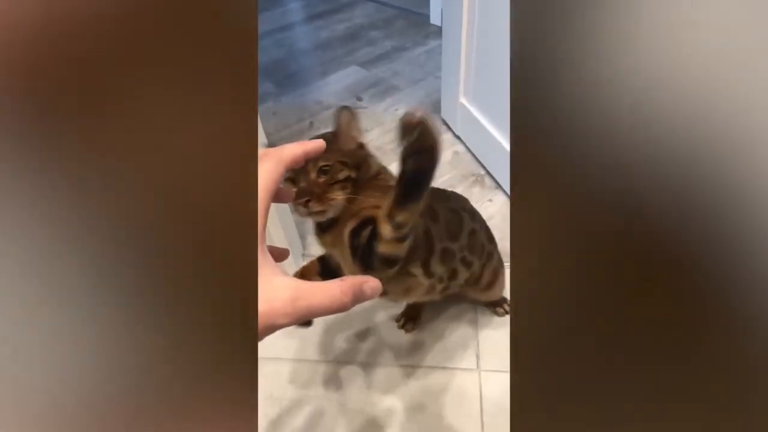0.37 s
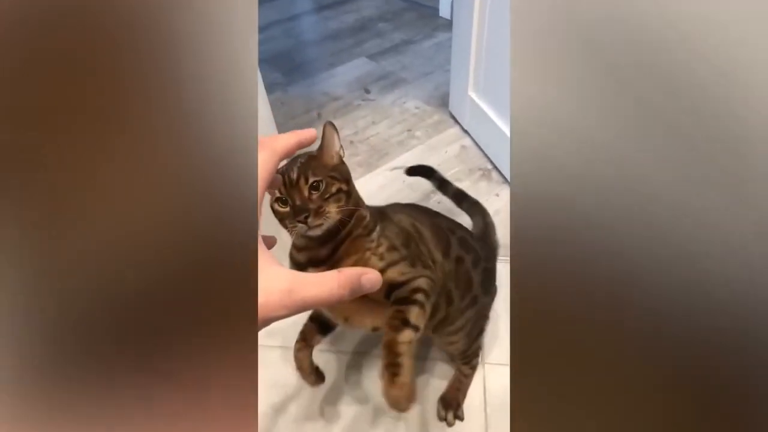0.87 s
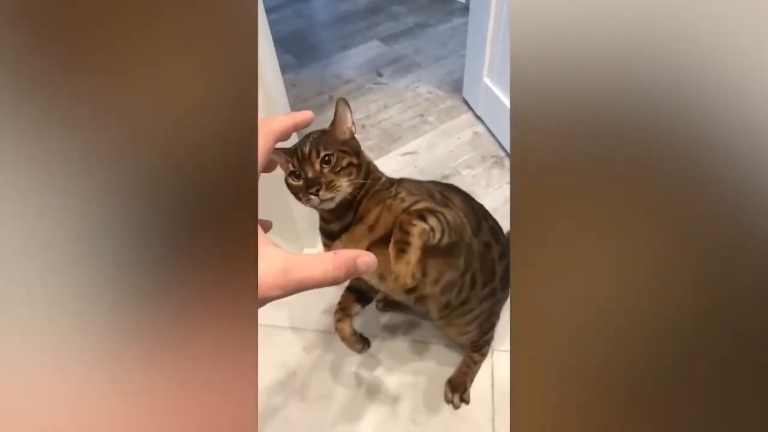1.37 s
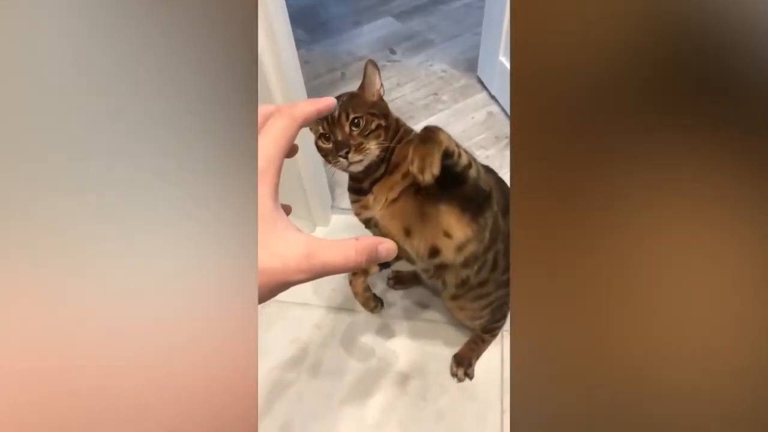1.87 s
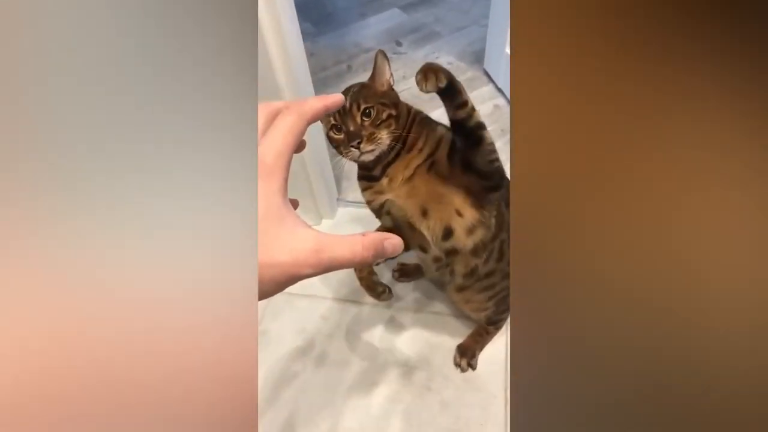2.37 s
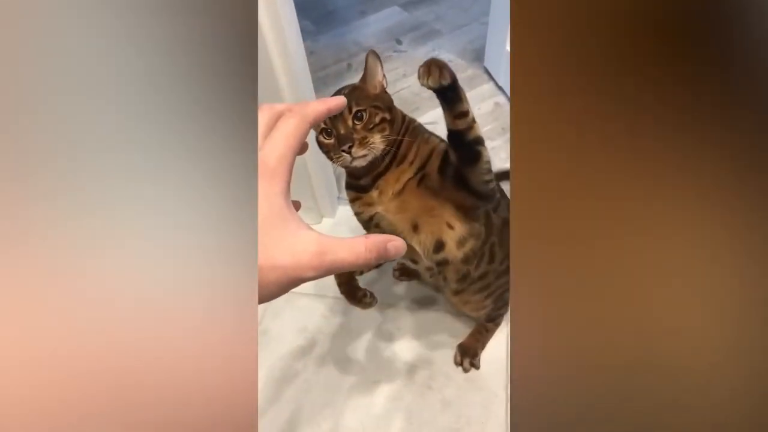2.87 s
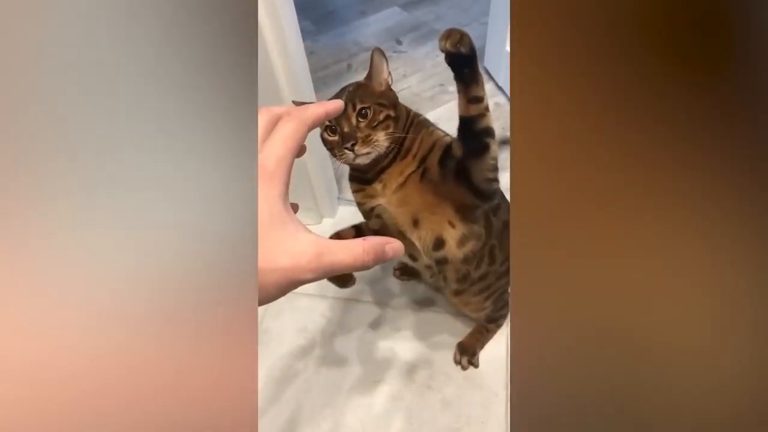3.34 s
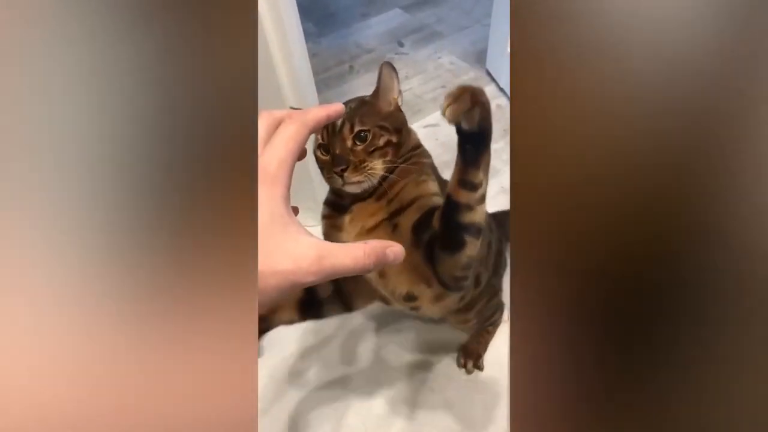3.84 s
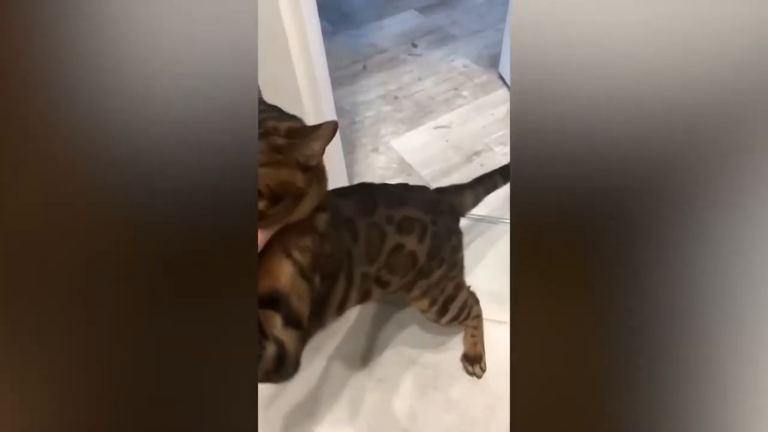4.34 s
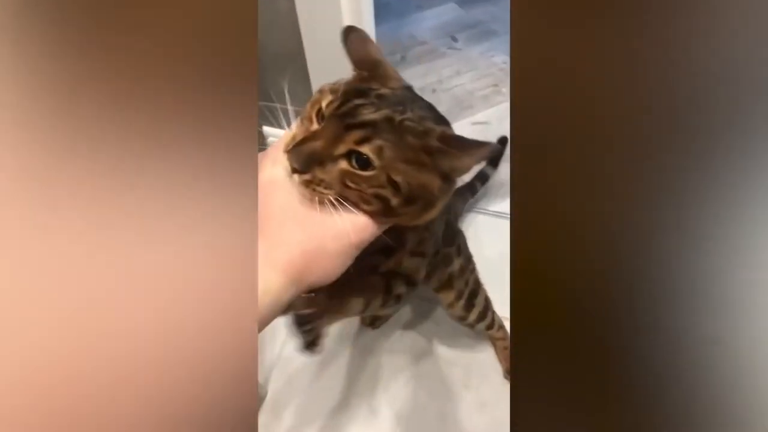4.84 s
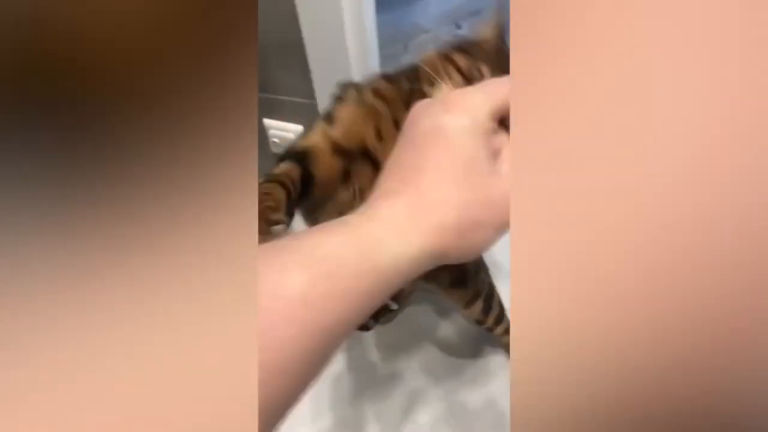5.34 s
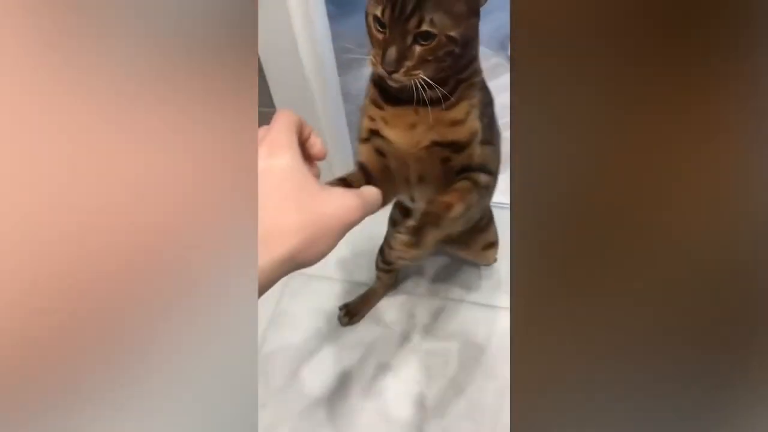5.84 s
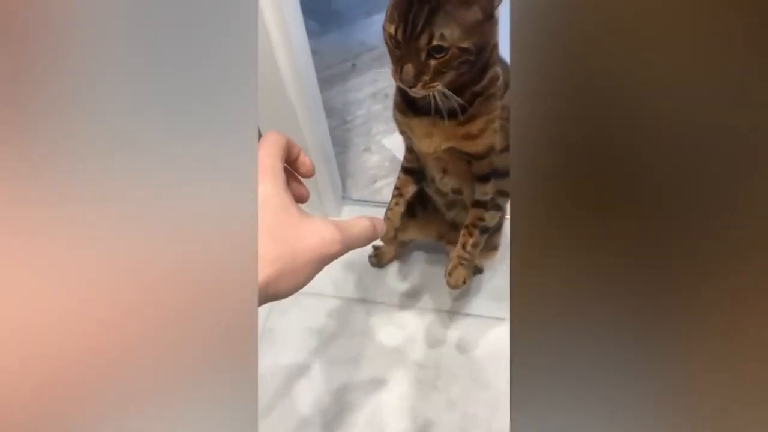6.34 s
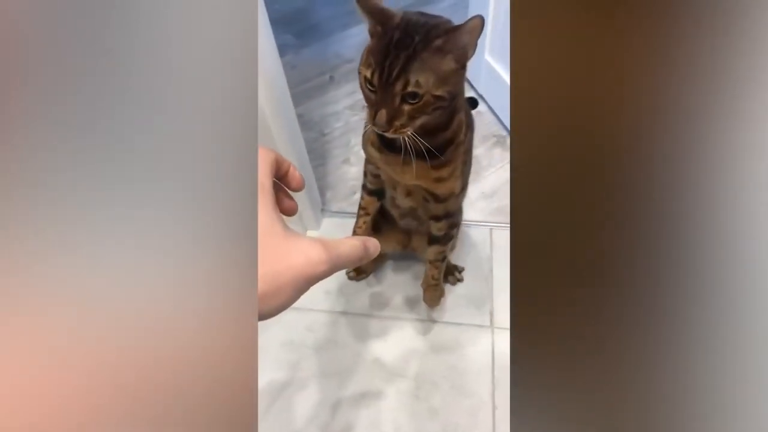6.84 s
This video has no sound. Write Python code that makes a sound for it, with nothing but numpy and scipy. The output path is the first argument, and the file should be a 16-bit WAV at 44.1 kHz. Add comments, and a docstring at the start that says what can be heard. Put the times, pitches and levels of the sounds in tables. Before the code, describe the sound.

A cat paws at a hand in a hard tiled room, caught in mono by a close phone microphone. Faint taps and a gritty skid come first, then a sharp, reverberant knock further away and a duller double knock with floor boom. After a quiet gap, a sudden scuffle of taps, fur and phone jolt, soft palm rubbing, then another quick pat and fading rustle.

```python
"""In a tiled room a cat paws at a hand, close to a mono phone microphone. Paws tap as minimum-phase impulses
and skid on tile as resonated friction noise; fur and a pushing head rub as clumped noise; the phone is jolted
by low noise and decaying sines. Further off something knocks, mostly heard through the room's noise tail, and
the floor booms as a sum of decaying modes. The room itself hisses and hums faintly as filtered noise."""
import sys
import numpy as np
from scipy import signal
from scipy.fft import rfft, irfft, next_fast_len
from scipy.io import wavfile
from scipy.ndimage import uniform_filter1d

SR = 44100
rng = np.random.default_rng(int(sys.argv[2]) if len(sys.argv) > 2 else 0)


def to_wav(sig):
    """Store sig (one row per channel, or 1-D mono) as 16-bit WAV at the path in sys.argv[1].

    Samples outside -1..1 are clipped; the rate is SR.
    """
    pcm = np.clip(np.atleast_2d(sig), -1, 1) * 32767
    pcm = np.round(pcm).astype(np.int16)
    wavfile.write(sys.argv[1], SR, pcm.T)  # frames by channels


def volts_from_decibels(level):
    """Turn decibel levels (scalar or array-like) into linear amplitude factors."""
    exponent = np.asarray(level, float) / 20
    return 10 ** exponent


N = 306814

# Steady air noise. Each row: frequency in Hz, relative power density in dB.
AIR_SPECTRUM = [(12, -56), (20, -39), (50, -3.5), (70, -3), (163, -13.5), (270, -13), (337, -16),
                (485, -20), (542, -19), (780, -21.5), (1710, -28), (2200, -29.5), (4810, -34),
                (14700, -40.5), (16000, -30)]
# Narrow hummed bands in the room tone. Each row: centre in Hz, width in Hz, rms level in dB.
HUM_BANDS = [(788, 34, -70.5), (998, 19, -78), (2186, 9.9, -82.5)]
# Reverberant tail of the tiled room. Each row: frequency in Hz, t60 in seconds, relative strength in dB.
ROOM_DECAY = [(200, 0.31, 13.5), (690, 0.42, 6), (2030, 0.34, 0), (4000, 0.38, 0.5), (8500, 0.2, 2.5),
              (15200, 0.086, 2)]
# Blows and soft footfalls that shake the floor. Each row: start in seconds, boom gain in dB.
FLOOR_SHOCKS = [(0.122, -55), (0.739, -46), (1.861, -33), (2.118, -40), (2.282, -50), (2.397, -29.5),
                (2.68, -47), (3.368, -52), (3.6, -53), (3.72, -54), (4.3, -45), (4.764, -54),
                (5.603, -49.5), (6.748, -51)]
# Modes of the floor. Each row: frequency in Hz, mean relative level in dB, t60 in seconds.
FLOOR_MODES = [(57.47, -2.5, 0.81), (73.16, 0.5, 0.62), (129.6, -14, 1.1), (183.4, -5.5, 0.24),
               (211, -12, 0.88), (233.1, -11, 0.47), (265.5, -12.5, 0.55), (361, -13.5, 0.38)]
# Paw and claw taps near the microphone. Each row: start in seconds, peak of the push in dB, crack in Hz,
# body against crack in dB, edge against crack in dB.
TAPS = [(.265, -42, 4000, -12, -7), (0.727, -40.5, 2900, -2, -28), (4.012, -37.5, 1340, -8, -26),
        (4.127, -28, 2550, -7, -18), (4.158, -29, 1490, 6, 1), (4.442, -42, 1550, -13, -29.5),
        (5.331, -28, 1690, 6.5, -14.5), (5.415, -38, 2900, -2, -22), (5.518, -38.5, 2460, -21, -12),
        (5.739, -43, 3220, -12, -14), (6.622, -47.5, 3750, -18, -19)]
# Strokes of fur. Each row: peak time in seconds, rise and fall over 20 dB in seconds,
# coarse level in dB, fine hiss level in dB.
FUR_STROKES = [(.602, 0.028, 0.036, -57, -48.5), (.676, 0.056, 0.06, -60, -56.5),
               (3.676, .04, 0.061, -63, -69), (4.131, 0.0081, 0.022, -33.5, -38),
               (4.162, 0.018, 0.096, -37, -44.5), (4.3, 0.24, 0.51, -70, -75), (4.61, .25, 0.24, -67, -71),
               (4.79, 0.33, 0.38, -61.5, -62), (5.262, 0.22, 0.081, -61, -61),
               (5.335, .015, 0.02, -46, -45.5), (5.36, 0.12, 0.13, -58, -60),
               (5.414, 0.063, 0.053, -49, -50.5), (5.62, 0.43, 0.34, -68, -68.5),
               (5.86, 0.25, 0.39, -67.5, -69)]
# Coarse rubbing of fur. Each row: frequency in Hz, relative power density in dB.
FUR_SPECTRUM = [(700, 5), (1300, 4), (2600, 1), (4500, -1.5), (6500, -5.5), (9000, -62)]
# Fine friction hiss of fur and pads. Each row: frequency in Hz, relative power density in dB.
FINE_SPECTRUM = [(4500, -24), (6000, -1), (9000, 0), (10500, -4), (13500, -1), (16000, -1)]
# Paw pads skidding on tile. Each row: peak time in seconds, rise and fall over 20 dB in seconds,
# grit level in dB, fine hiss level in dB.
SKIDS = [(.761, .03, .022, -39, -45.5), (.791, 0.028, 0.046, -48, -43.5), (.83, 0.11, 0.17, -64.5, -60.5),
         (3.0, .15, 0.27, -64, -78), (5.265, 0.11, 0.088, -57.5, -73)]
# Resonances of the skidding pads. Each row: centre in Hz, width in Hz, relative gain in dB.
PAD_RESONANCES = [(2900, 570, 5), (4970, 1300, 1)]
# Far knocks. Each row: start in seconds, peak of the push in dB, crack in Hz,
# thud against crack in dB, body against crack in dB.
KNOCKS = [(1.855, -34, 2300, 18, 11), (2.107, -8, 2620, -5, -3.5), (2.336, -24, 1760, -10, -6.5),
          (2.342, -23.5, 1840, -8, -4), (2.392, -22, 2280, 13, 4.5), (2.735, -51.5, 2450, 22, 5)]
# Frequencies the far object favours. Each row: frequency in Hz, gain in dB.
STRUCK_COLOUR = [(150, 1), (222, 6.5), (400, -5), (640, 6), (800, -0.5), (1000, 5.5), (1450, 4), (2150, 6),
                 (2800, 0), (3600, 1.5), (5000, -2), (6200, 2), (8000, -3)]
# The head pushed into the palm. Each row: peak time in seconds, rise and fall over 20 dB in seconds, level in dB.
HEAD_RUBS = [(4.59, 0.64, 0.12, -59.5), (4.95, 0.29, 0.38, -59)]
# Rubbing in the palm. Each row: frequency in Hz, relative power density in dB.
PALM_SPECTRUM = [(180, -21), (350, 10.5), (600, 7.5), (900, 0), (1600, -27)]
# The phone shaken in the hand. Each row: peak time in seconds, rise and fall over 20 dB in seconds, level in dB.
JOLTS = [(4.178, 0.024, 0.019, -25), (4.215, 0.03, 0.081, -38)]
# Pushes on the shaken microphone. Each row: frequency in Hz, relative power density in dB.
SHAKE_SPECTRUM = [(20, -30), (40, -2), (70, 8), (110, -18), (200, -5.5), (450, -20.5), (700, -10.5),
                  (1200, -40), (2500, -72)]
# A knuckle or paw bumping the phone. Each row: start in seconds, frequency in Hz, initial amplitude in dB.
BUMPS = [(4.159, 193, -27), (5.385, 221, -40), (5.397, 190, -31)]


def unit(x):
    """Normalisation: the signal is scaled to rms 1."""
    return x / np.sqrt(np.mean(x ** 2) + 1e-20)


def along(points, hz):
    """Logarithmic frequency: (Hz, value) points are interpolated on a log axis."""
    f, v = np.transpose(points)
    return np.interp(np.log(hz + 1), np.log(f + 1), v)


def filtered(x, response):
    """Linear filtering: the spectrum is multiplied by a response of frequency, which may be complex."""
    m = next_fast_len(len(x) + 8192)
    spectrum = rfft(x, m) * response(np.fft.rfftfreq(m, 1 / SR))
    return irfft(spectrum, m)[:len(x)]


def resonances(peaks):
    """Damped oscillators: causal responses of (Hz, width Hz, dB) rows, summed with alternating sign."""
    def response(f):
        return sum((-1) ** k * volts_from_decibels(db) * 1j * f * width / (centre * centre - f * f + 1j * f * width)
                   for k, (centre, width, db) in enumerate(peaks))
    return response


def causal(gain_db):
    """Minimum phase: folding the cepstrum of a dB-against-Hz colour gives its impulse response, peak 1."""
    cepstrum = irfft(np.log(volts_from_decibels(gain_db(np.fft.rfftfreq(4096, 1 / SR)))))
    cepstrum[1:2048] *= 2
    cepstrum[2049:] = 0
    response = irfft(np.exp(rfft(cepstrum)))
    return response / np.abs(response).max()


def hiss(spectrum, grain_db):
    """Modulated noise: samples come in clumps of random size, then are coloured and scaled to rms 1."""
    clumps = unit(uniform_filter1d(rng.standard_normal(N), size=60))
    grains = rng.standard_normal(N) * volts_from_decibels(grain_db * clumps)
    return unit(filtered(grains, lambda hz: volts_from_decibels(along(spectrum, hz))))


def swells(rows):
    """Exponential growth and decay: one gain per sample for each dB column, summed over the rows."""
    t = np.arange(N) / SR
    total = 0
    for s, rise, fall, *db in rows:
        distance = np.where(t < s, (s - t) / rise, (t - s) / fall)
        total = total + np.outer(volts_from_decibels(np.array(db)), volts_from_decibels(-20 * distance))
    return total


def add(track, s, sound):
    """Superposition: a sound is mixed into the track at s seconds."""
    part = track[round(s * SR):][:len(sound)]
    part += sound[:len(part)]


def room(x):
    """Reverberation: a noise tail in which each frequency has its own strength and decay time."""
    hz, t, z = signal.stft(rng.standard_normal(SR), SR, nperseg=256)
    t60 = along([row[:2] for row in ROOM_DECAY], hz)[:, None]
    strength_db = along([row[::2] for row in ROOM_DECAY], hz)[:, None]
    tail = signal.istft(z * volts_from_decibels(strength_db - 60 * t / t60), SR, nperseg=256)[1]
    return signal.fftconvolve(x, tail / np.linalg.norm(tail))


def blow(track, s, push, rattle, contact, wet_db):
    """Impact: a light touch, one sharp push and a short rattle; the push alone excites the room."""
    lead = 0.002  # s of light touch before the push
    t = np.arange(SR // 20) / SR - lead
    envelope = np.exp(np.where(t < 0, t / .0008, -t / max(contact, 1e-4)))
    force = rattle * rng.standard_normal(len(t)) * envelope
    force[round(lead * SR)] = 1
    add(track, s, signal.fftconvolve(force, push))
    add(track, s + lead + 0.001054, volts_from_decibels(wet_db) * room(push))


def room_tone():
    """Stationary noise: steady air hiss with a few narrow bands passed by resonances."""
    tone = volts_from_decibels(-56.5) * hiss(AIR_SPECTRUM, grain_db=0.37)
    for hz, width, db in HUM_BANDS:
        band = filtered(rng.standard_normal(N), resonances([(hz, width, 0)]))
        tone += volts_from_decibels(db) * unit(band)
    return tone


def boom(db, rise):
    """Modal decay: neighbouring modes start in opposite phase, so the low pair swells, then beats."""
    t = np.arange(SR) / SR
    ring = 0
    for k, (hz, level, t60) in enumerate(FLOOR_MODES):
        decay = volts_from_decibels(level + rng.normal(0, 1) - 60 * t / t60)
        ring = ring + (-1) ** k * decay * np.sin(2 * np.pi * hz * t)
    return volts_from_decibels(db) * ring * (1 - np.exp(-t / rise))


def floor_booms():
    """Modal excitation: blows and footfalls set the floor ringing."""
    out = np.zeros(N)
    for s, boom_db in FLOOR_SHOCKS:
        add(out, s, boom(boom_db, rise=0.02))
    return out


def taps():
    """Near-field impact: taps centre on one pitch with less room; harder ones rattle longer."""
    full_rattle_s, doubling_db = 0.0077, 13.5  # decay constant at 0 dB; halves with each such drop
    out = np.zeros(N)
    for s, db, crack_hz, body_db, edge_db in TAPS:
        colour = [(60, body_db - 18), (650, body_db), (.75 * crack_hz, -8), (crack_hz, 0),
                  (1.45 * crack_hz, -9), (6500, edge_db), (15000, edge_db - 2)]
        push = volts_from_decibels(db) * causal(lambda hz: along(colour, hz))
        contact = full_rattle_s * 2 ** (db / doubling_db)
        blow(out, s, push, rattle=.2, contact=contact, wet_db=-1.5)
    return out


def fur():
    """Sliding friction: hairs slip over skin as clumped noise, coarse and fine."""
    coarse, fine = swells(FUR_STROKES)
    return coarse * hiss(FUR_SPECTRUM, grain_db=2.0) + fine * hiss(FINE_SPECTRUM, grain_db=2.0)


def skids():
    """Resonated friction: grainy noise drives the pads' resonances, with fine hiss on top and a room tail."""
    level, fine = swells(SKIDS)
    grit = hiss([(900, -30), (1700, -3), (2400, 0), (16000, -3)], grain_db=2.5)
    skid = level * unit(filtered(grit, resonances(PAD_RESONANCES)))
    skid = skid + fine * hiss(FINE_SPECTRUM, grain_db=2.0)
    return skid + volts_from_decibels(-8) * room(skid)[:N]


def knocks():
    """Far-field impact: the room outweighs the direct push, and a duller blow has more edge."""
    hollow_db, top_db = -4, -3.5  # dip under the crack, top against the edge
    out = np.zeros(N)
    for s, db, crack_hz, thud_db, body_db in KNOCKS:
        edge_db = -19 + 0.3 * thud_db
        tilt = [(60, thud_db - 15), (230, thud_db), (680, body_db), (.6 * crack_hz, hollow_db), (crack_hz, 0),
                (1.5 * crack_hz, -4), (6500, edge_db), (9500, edge_db - 4), (13500, edge_db + top_db)]
        push = volts_from_decibels(db) * causal(lambda hz: along(tilt, hz) + along(STRUCK_COLOUR, hz))
        blow(out, s, push, rattle=.08, contact=.004, wet_db=2)
    return out


def head_rubs():
    """Friction under pressure: the head pushed into the palm rubs lower than loose fur."""
    return swells(HEAD_RUBS)[0] * hiss(PALM_SPECTRUM, grain_db=-3.0)


def jolts():
    """Inertial shaking: lumpy low pushes on the microphone of a phone shaken in the hand."""
    return swells(JOLTS)[0] * hiss(SHAKE_SPECTRUM, grain_db=3)


def bumps():
    """Heavily damped oscillation: each bump on the phone is a dull sine that dies within a few cycles."""
    out = np.zeros(N)
    t = np.arange(SR // 10) / SR
    t60 = 0.03  # s
    for s, hz, db in BUMPS:
        add(out, s, volts_from_decibels(db - 60 * t / t60) * np.sin(2 * np.pi * hz * t))
    return out


def scene():
    """Superposition at one point: every source reaches one microphone, given to both channels."""
    mono = room_tone() + floor_booms() + taps() + fur() + skids() + knocks() + head_rubs() + jolts() + bumps()
    return np.array([mono, mono])


def top_cut(x):
    """Nothing passes above the cut-off."""
    return signal.sosfilt(signal.butter(12, 16430, fs=SR, output="sos"), x)


def record(dry):
    """Band limitation: nothing at or above 15600 Hz is kept in the finished mix."""
    kept = np.array([filtered(channel, lambda hz: hz < 15600) for channel in dry])
    return top_cut(kept)


dry = scene()
out = record(dry)
to_wav(out)
```